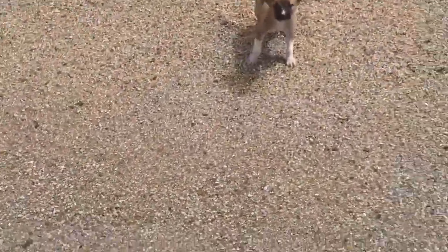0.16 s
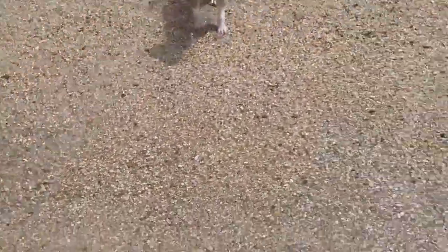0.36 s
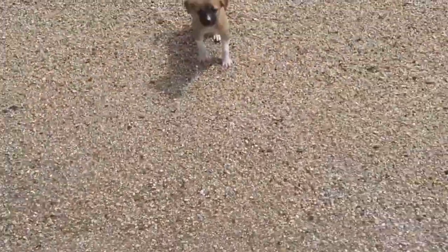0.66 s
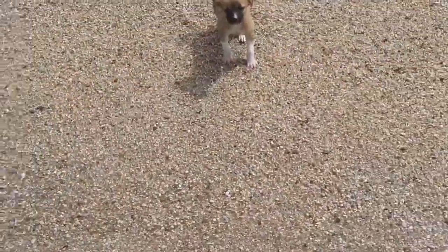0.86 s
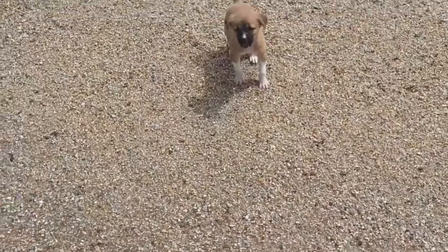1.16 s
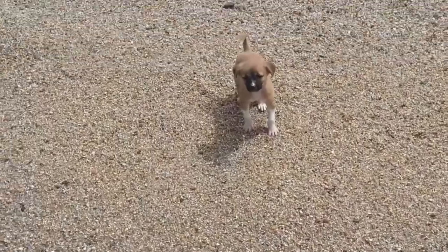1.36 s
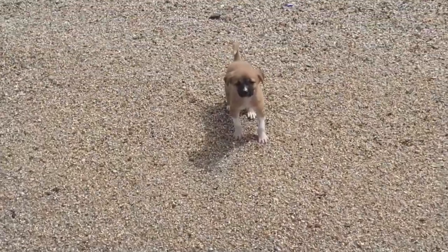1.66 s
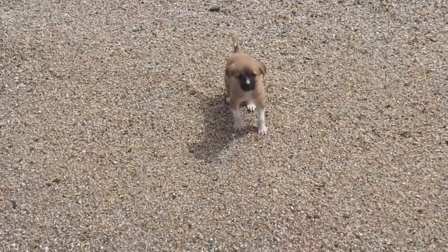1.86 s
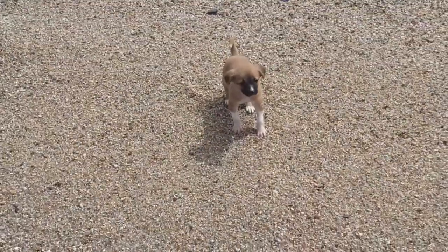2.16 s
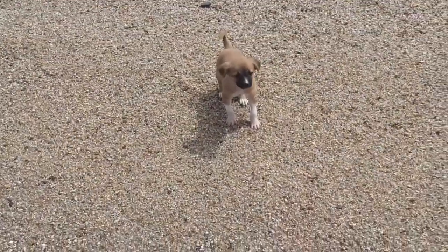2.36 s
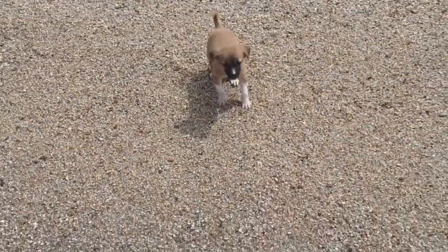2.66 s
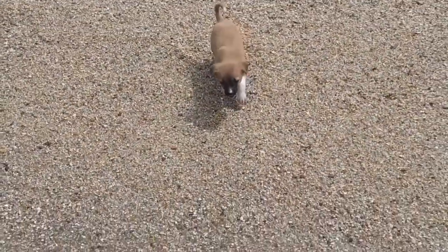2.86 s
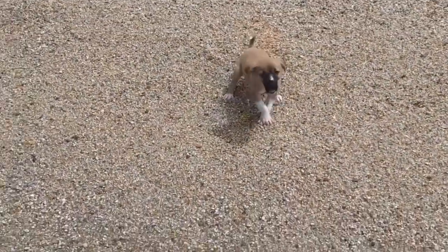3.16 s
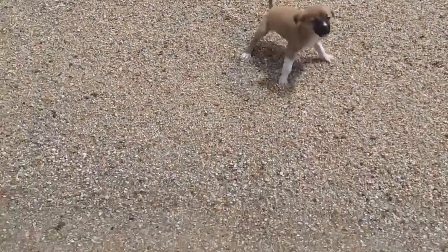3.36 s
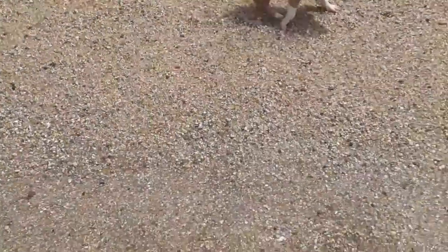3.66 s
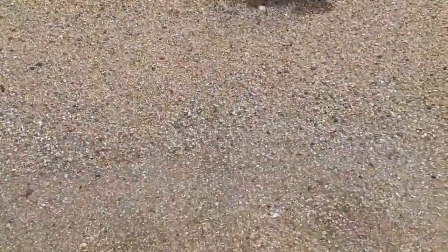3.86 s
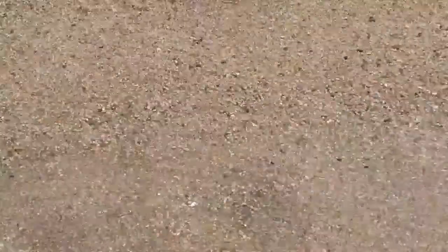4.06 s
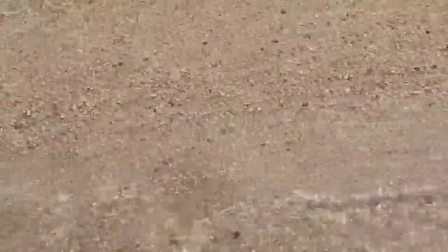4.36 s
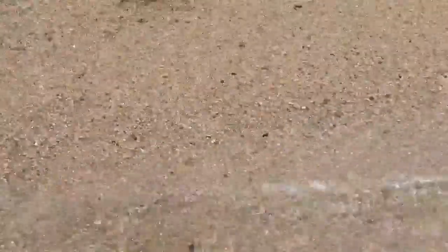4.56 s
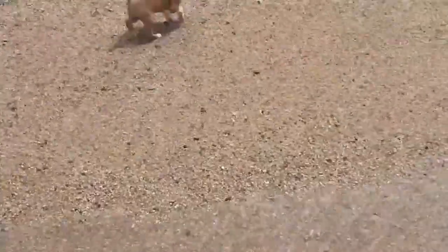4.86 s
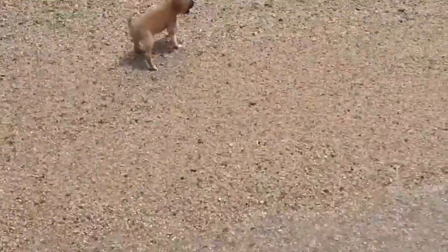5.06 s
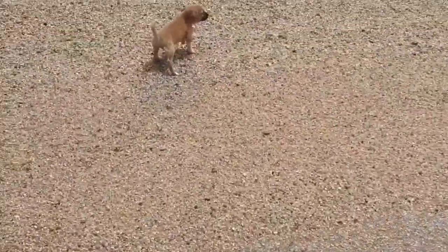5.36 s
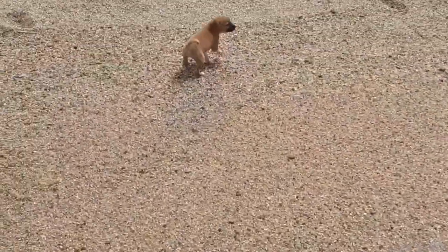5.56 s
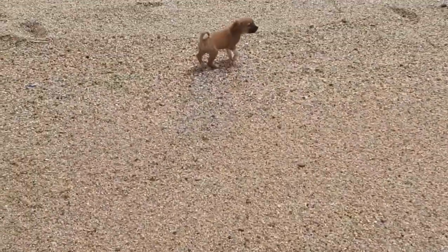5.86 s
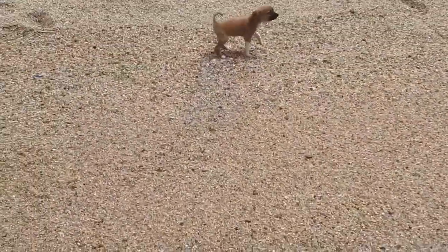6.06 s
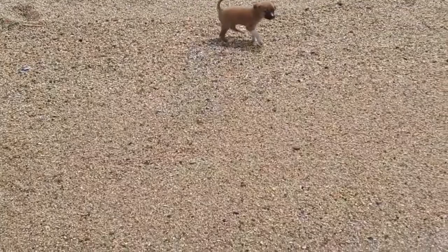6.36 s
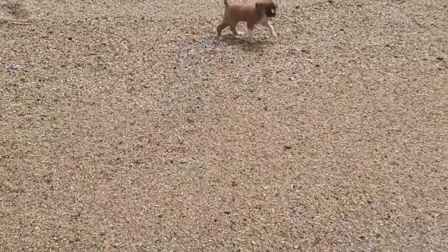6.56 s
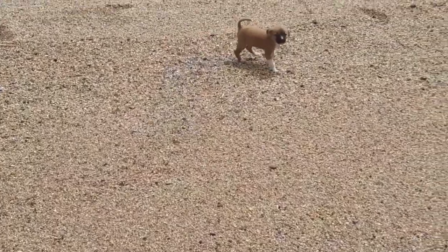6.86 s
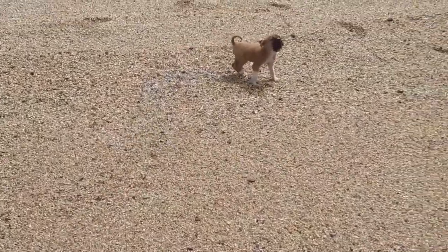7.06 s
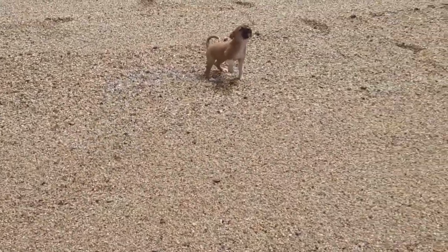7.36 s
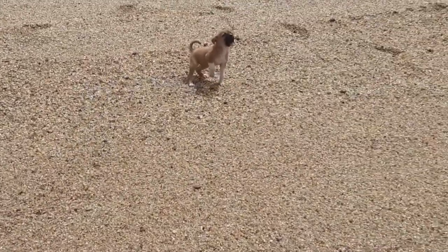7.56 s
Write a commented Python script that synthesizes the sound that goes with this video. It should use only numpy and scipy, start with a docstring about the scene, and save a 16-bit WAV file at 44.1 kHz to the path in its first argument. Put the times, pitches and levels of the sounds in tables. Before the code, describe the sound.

A small puppy yelps close to a stereo microphone on an open pebble beach, with very little echo. A strong, slightly broken yelp opens at 0 s, amid brief soft wind bumps that fade by 0.3 s. Single high yips follow at about 0.6, 1.2 and 1.8 s, with a tiny faint squeak at 2.25 s. At 2.6 s comes the loudest, brightest yip, running into a tight cluster of longer, whining cries until about 3.5 s, increasingly hoarse. From 3.7 to 7 s softer yelps repeat roughly every 0.4 to 0.5 s, rising quickly, cracking into rasp and dropping into thin whines; those near 6.6 and 7.1 s are somewhat stronger. A weak whimper at 7.35 s precedes a last yelp near 7.6 s. Underneath, quiet low surf swells gently, fullest around 6.3 s, with faint wind and fine pebble ticks that gradually thin out.

```python
"""On an open pebble beach a small puppy yelps close by, over low surf, ticking pebbles and light wind.
Source and filter make each yelp: vocal pulses on a gliding pitch, driven by one push, pass throat and jaw.
Most yelps climb and fall in pitch, many break into a rasp, and a thin whine runs beneath the push.
Surf is filtered noise with a slow swell, pebbles are short random ticks, and wind is low noise in gusts."""
import sys
import numpy as np
from scipy import signal
from scipy.fft import rfft, irfft, next_fast_len
from scipy.io import wavfile
from scipy.ndimage import uniform_filter1d, minimum_filter1d

SR = 44100
rng = np.random.default_rng(int(sys.argv[2]) if len(sys.argv) > 2 else 0)


def store_pcm(level_fs):
    """Save levels as 16-bit WAV."""
    pcm = np.round(np.clip(level_fs, -1, 1) * 32767).astype(np.int16)
    wavfile.write(sys.argv[1], SR, np.atleast_2d(pcm).T)


N = 340893  # length [samples]
EDGE_HZ = 15750  # upper band limit


# One yelp a row: (start [s], length [s], pitch rise [s], pitch fall [s], start pitch [Hz], top pitch [Hz],
#  whine pitch [Hz], delay to full push [s], attack [s], hold [s], release [s], relative push level [dB],
#  relative whine level [dB], upper against lower partials [dB]); shifts, lift and droop then bend the pitch
YELP_ROWS = [(0.0, 0.29, 0.089, 0.025, 1296, 1405, 1090, 0, 0.01, 0.073, 0.037, -6, -45, -12),
             (0.549, 0.38, 0.073, 0.048, 945, 1400, 1092, 0.05, 0.016, 0.0087, 0.093, -18, -45.5, -14.5),
             (1.142, 0.44, 0.092, 0.025, 860, 1366, 993, 0.041, 0.017, 0.025, 0.044, -13.5, -42.8, -3),
             (1.779, 0.24, 0.086, 0.041, 815, 1462, 1003, 0.05, 0.02, 0.011, 0.076, -8.5, -39.5, -14),
             (2.248, 0.045, 0.029, 0.062, 893, 968, 890, 0.0021, 0.005, 0.012, 0.012, -38.5, -56.0, -21),
             (2.566, 0.19, 0.086, 0.02, 732, 1567, 1400, 0.042, 0.015, 0.025, 0.028, 2, -29, -9.5),
             (2.746, 0.22, 0.14, 0.14, 1254, 1562, 1420, 0.052, 0.033, 0.11, 0.06, -9, -31, -7),
             (3.125, 0.21, 0.028, 0.12, 1166, 1428, 1346, 0.037, 0.024, 0.12, 0.061, -9, -32.5, -9.3),
             (3.326, 0.24, 0.17, 0.02, 1124, 1400, 1303, 0.065, 0.045, 0.11, 0.039, -10.5, -37, -9),
             (3.704, 0.31, 0.066, 0.12, 955, 1351, 1138, 0.037, 0.041, 0.079, 0.093, -17.5, -50.5, -4.5),
             (4.186, 0.32, 0.12, 0.035, 880, 1453, 1101, 0.023, 0.021, 0.005, 0.15, -20.5, -47.7, 1),
             (4.644, 0.22, 0.11, 0.052, 888, 1364, 1070, 0.039, 0.047, 0.055, 0.083, -23, -56, 1),
             (5.027, 0.19, 0.1, 0.058, 891, 1306, 985, 0.036, 0.044, 0.0054, 0.17, -24.5, -44, -4),
             (5.399, 0.19, 0.094, 0.053, 869, 1320, 975, 0.056, 0.086, 0.047, 0.057, -21.5, -52, -3),
             (5.77, 0.22, 0.085, 0.062, 752, 1276, 954, 0.011, 0.0088, 0.069, 0.04, -23.5, -46, -2.5),
             (6.168, 0.3, 0.12, 0.038, 729, 1324, 1027, 0.0087, 0.152, 0.12, 0.045, -20, -52, -0.9),
             (6.578, 0.32, 0.13, 0.069, 810, 1371, 1055, 0.032, 0.038, 0.1, 0.061, -14, -46.0, -4.5),
             (7.056, 0.33, 0.031, 0.12, 846, 1327, 936, 0.063, 0.12, 0.04, 0.074, -14.5, -50.5, -7.5),
             (7.339, 0.096, 0.038, 0.044, 954, 919, 860, 0.017, 0.037, 0.043, 0.008, -36.5, -58, -34),
             (7.573, 0.23, 0.055, 0.093, 817, 1263, 1110, 0.1, 0.12, 0.0055, 0.068, -15, -49, -7.5)]
# Level difference of the puppy at two microphone ports: (frequency [Hz], left minus right [dB])
PORT_BALANCE = [(1400, -2), (4300, -3), (7000, -9.5), (9000, 7), (13000, 6.5)]
# Phase difference at the ports: (frequency [Hz], lead of left over right [rad])
PORT_PHASE = [(1400, 0.29), (3200, 1.01), (4000, 0.84), (5000, 1.2)]


def puppy():
    """Superposition: the direct yelps, with level and phase differences at the ports, plus ground scatter."""
    voice = sum(yelp(*row) for row in YELP_ROWS)

    def port_response(hz):
        half_phases = np.outer([.5, -.5], read(PORT_PHASE, hz))
        return ports(PORT_BALANCE, hz) * np.exp(1j * half_phases)

    return shaped(voice, port_response) + beach(voice)


# Nasal radiation of the whine's upper partials: (frequency [Hz], relative level [dB])
NOSE_RESPONSE = [(2700, -43.5), (3300, -11), (4100, -8.5), (4600, 0), (5400, -6), (6200, -12), (7000, -8.5),
                 (8500, -26.5)]
LOWER_DB_PER_OCTAVE, UPPER_DB_PER_OCTAVE = 20, 24.5  # a higher voice is louder, and brighter
WHINE_SWELL_DB, WHINE_BRIGHT_DB = 10, -15.5  # the whine is dull and grows towards its end


def yelp(start, length, rise_s, fall_s, start_hz, top_hz, whine_hz,
         delay_s, attack_s, hold_s, release_s, level_db, whine_db, bright_db):
    """Source-filter principle: effort and pitch weight the partials of a push laid over a thin whine."""
    t = np.arange(max(round(start * SR), 0), min(round((start + length) * SR), N)) / SR
    age = t - start
    step, step_db = voice_shift(t)
    hz = pitch(age, length, rise_s, fall_s, start_hz, top_hz, whine_hz) * (1 + step)
    octaves = np.log2(hz / top_hz)
    effort_db = level_db + push(age - delay_s, attack_s, hold_s, release_s) + surges(t)
    whine = gain_of(whine_db + WHINE_SWELL_DB * (age / length - 1))

    pulses = folds(t, hz)
    lower, upper = throat(t, pulses)
    nasal = evened(shaped(pulses, lambda f: gain_of(read(NOSE_RESPONSE, f))))
    lower_push = gain_of(effort_db + LOWER_DB_PER_OCTAVE * octaves + step_db)
    upper_push = gain_of(effort_db + UPPER_DB_PER_OCTAVE * octaves + bright_db)
    sound = lower * np.hypot(lower_push, whine) + upper * upper_push
    sound += nasal * whine * gain_of(WHINE_BRIGHT_DB)

    fade_s = 0.0036
    fade = np.clip(np.minimum(age, length - age) / fade_s, 0, 1)
    return np.interp(np.arange(N) / SR, t, sound * fade, 0, 0)


FALL_POWER = 2.5  # how sharply the pitch leaves its top
END_DROOP, DROOP_S = .16, .016  # share of the pitch lost as the whine stops, and its time constant


def pitch(t, length, rise_s, fall_s, start_hz, top_hz, whine_hz):
    """Frequency glide: climb to the top, settling onto the whine, then a slight lift and a final droop."""
    lift, lift_s = .04, .06
    climb = (top_hz - start_hz) * np.maximum(1 - t / rise_s, 0) ** 2
    fall = (np.maximum(t - rise_s, 0) / fall_s) ** FALL_POWER
    settle = (top_hz - whine_hz) * (1 - 1 / (1 + fall))
    ending = 1 + lift * np.exp((t - length) / lift_s) - END_DROOP * np.exp((t - length) / DROOP_S)
    return (top_hz - climb - settle) * ending


PUSH_DB, PUSH_POWER = 23.5, 1.37  # gained over one attack time and lost over one release time


def push(t, attack_s, hold_s, release_s):
    """Effort envelope [dB]: attack up to time 0, hold, then a release that steepens."""
    away = np.maximum(-t, 0) / attack_s + np.maximum(t - hold_s, 0) / release_s
    return -PUSH_DB * away ** PUSH_POWER


# Shifts of the voice: flips into another register, or moments locked onto the throat resonance:
#  (start [s], end [s], pitch step [share], step of the lower partials [dB])
VOICE_SHIFTS = [(0.082, .335, -.06, -2.5), (1.184, 1.219, -0.029, -6), (2.616, 2.645, -0.12, -11),
                (2.82, 2.889, -0.026, -5), (3.238, 3.348, -0.066, -8.5), (3.47, 3.484, -.03, -4.5),
                (3.811, 4.025, -0.00071, -4), (5.487, 5.51, .01, 5), (5.835, 5.865, 0.016, 5),
                (6.681, 6.905, -0.041, -6), (7.666, 7.77, -0.065, -6.5)]
SHIFT_S = .004  # duration of each edge


def voice_shift(t):
    """Register transition or resonance locking: steps of pitch (share) and lower partials (dB)."""
    steps = 0
    for start, end, step, step_db in VOICE_SHIFTS:
        shifted = np.clip(np.minimum(t - start, end - t) / SHIFT_S + .5, 0, 1)
        steps = steps + np.outer([step, step_db], shifted)
    return steps


# Where the voice breaks: (start [s], end [s], chaos [0-1], lingering of period doubling afterwards [s])
VOICE_BREAKS = [(0, 0.064, 0.52, 0.0021), (2.821, 2.875, 0.39, 0.015), (3.12, 3.229, 0.87, 0.021),
                (3.387, 3.462, 0.59, 0.025), (3.71, 3.791, 0.8, 0.027), (4.217, 4.291, 0.94, 0.004),
                (4.675, 4.724, 0.84, 0.038), (5.069, 5.113, 0.46, 0.037), (5.456, 5.479, 0.26, 0.0031),
                (5.824, 5.82, 0.26, 0.0018), (6.211, 6.235, 0.63, 0.021), (6.616, 6.679, 0.95, 0.024),
                (7.065, 7.181, 0.87, 0.0057), (7.36, 7.358, 0, 0.031), (7.618, 7.673, 0.67, 0.0032)]
STRAIN, STRAIN_S = 0.21, 0.034  # the voice frays as a break comes near: share of its chaos, time constant
JITTER = .002  # rms share of the pitch, always present


def folds(t, hz):
    """Coupled oscillators: clean pulses rasp as two folds lose step, then alternate strong and weak."""
    rise_s, fall_s = 0.027, 0.02  # edges of a break

    def gate(start, end):
        return np.clip(np.minimum((t - start) / rise_s + 0.59, (end - t) / fall_s + .5), 0, 1)

    chaos, doubling = 0, 0
    for start, end, depth, linger in VOICE_BREAKS:
        strain = STRAIN * np.exp(-abs(t - start) / STRAIN_S) * (t < start)
        chaos = chaos + depth * np.maximum(gate(start, end), strain)
        doubling = doubling + gate(start, end + linger)

    chaos_jitter = 0.0569

    def phase_of(f):
        unsteady = 1 + JITTER * wobble(len(t), 120) + chaos_jitter * chaos * wobble(len(t), 306)
        return 2 * np.pi * np.cumsum(f * unsteady) / SR

    tilt_db, even_db = -3, -6  # per octave; a clean voice is hollow: its even partials are weak
    flicker_db, flicker_hz = 2.5, 30  # each partial waxes and wanes on its own

    def partial(angle, k):
        level_db = tilt_db * np.log2(k) + flicker_db * wobble(len(t), flicker_hz)
        return np.cos(k * angle) * gain_of(level_db) * (k * hz < EDGE_HZ)

    sag = .04  # the rasp pulls the pitch down
    slow_ratio, slow_share = .79, .8  # the second fold drags below the first
    angle, slow_angle = phase_of(hz * (1 - sag * chaos)), phase_of(hz * slow_ratio)
    pulses = sum(partial(angle, k) * gain_of(even_db * (k % 2 == 0)) for k in range(1, 15))
    slow_pulses = slow_share * chaos ** 2 * sum(partial(slow_angle, k) for k in range(1, 9))
    halves, shimmer = 0.42, 0.83
    strength = 1 + halves * doubling * np.cos(angle / 2) + shimmer * chaos * wobble(len(t), 420)

    air_hz, leak, rasp = 1300, 0.0056, 1.0
    body_db, body_hz, body_width_hz = 7, 1900, 380  # the rasp is throaty, with no bass

    def air_response(f):
        body = body_db * np.exp(-((f - body_hz) / body_width_hz) ** 2)
        return f ** 4 / (f ** 4 + air_hz ** 4) * gain_of(body)

    air = shaped(rng.standard_normal(len(t)), air_response)
    puffs = (leak + rasp * chaos) * (1 + np.cos(angle)) * air
    return (pulses + slow_pulses) * strength + puffs


def surges(t):
    """Random amplitude modulation: a rasp comes in uneven surges of level [dB]."""
    surge_db, surge_hz = 2.2, 55
    inside = sum(depth * (t > start) * (t < end) for start, end, depth, linger in VOICE_BREAKS)
    return surge_db * smooth(inside, size=300) * wobble(len(t), surge_hz)


# Response of throat and muzzle before the mouth moves it: (frequency [Hz], relative level [dB])
THROAT_RESPONSE = [(550, -66), (900, -13.5), (1150, -13.5), (1430, 5.5), (1750, 3), (2300, -0.5),
                   (2900, -26.5), (3450, -16.5), (4100, -14), (4900, -15), (5800, -21.5), (6500, -21),
                   (7300, -30.5), (8300, -42.5), (11000, -79), (13500, -37.5), (16000, -61.5)]
# Mouth: (time [s], jaw opening as lift of the second resonance [dB], factor on the throat's frequencies)
MOUTH_SHAPE = [(.1, -7, 0.97), (.75, -24, 0.92), (1.35, -10.5, 0.94), (1.9, -21, 0.97), (2.65, -10.5, 0.99),
               (2.86, 5, 0.99), (3.35, -11.5, 0.97), (3.85, -4, 1.003), (4.35, 4, 0.99), (4.75, 1, 0.99),
               (5.1, -13.5, 1.035), (5.5, -20, 0.97), (5.9, -13, .99), (6.7, -6.5, 1.005), (7.25, -5, 0.97),
               (7.65, -3.5, 0.96)]


def throat(t, pulses):
    """Tract resonance: throat and jaw filter the pulses into lower and upper partials, each evened."""
    jaw_db, scale = follow(MOUTH_SHAPE, t.mean())
    jaw_hz, jaw_width_hz, notch_hz = 2020, 340, 2900

    def tract_response(f):
        shift = scale ** np.minimum(f / notch_hz, 1) ** 2  # the mouth moves the upper resonances most
        jaw = jaw_db * np.exp(-((f - jaw_hz) / jaw_width_hz) ** 2)
        return gain_of(read(THROAT_RESPONSE, f / shift) + jaw)

    voice = shaped(pulses, tract_response)
    lower = shaped(voice, lambda f: 1 / (1 + (f / notch_hz) ** 24))
    return steadied(lower), steadied(voice - lower)


def beach(x):
    """Diffuse scattering: open ground returns only a faint, short, decaying scatter off the pebbles."""
    t = np.arange(SR // 3) / SR
    scatter_db, t60 = -31, .25  # t60 in s
    taps = rng.standard_normal((2, len(t))) * gain_of(-60 * t / t60) * (t > .004)
    taps /= np.linalg.norm(taps[0])
    return gain_of(scatter_db) * signal.fftconvolve(x[None], taps, axes=1)[:, :N]


# Spectrum of the wash: (frequency [Hz], relative level per Hz [dB])
SURF_SPECTRUM = [(25, -63.5), (60, -20), (105, 4), (170, -6), (330, 2), (500, -10), (1200, -18.5),
                 (1900, -20), (3000, -31.5), (6300, -30.5), (9800, -46.5), (13500, -38.5), (16000, -42)]
# Slow swell of the roar: (time [s], relative level [dB])
SURF_SWELL = [(0, -36.5), (.8, -45), (2.1, -38), (3.2, -41.5), (3.8, -42), (4.7, -39), (5.6, -35),
              (6.3, -32), (7.7, -35.5)]
# Likeness of the two channels: (frequency [Hz], correlation)
SURF_LIKENESS = [(50, 0.1), (190, 1), (1000, 0.057), (12000, 0.4)]
# Level difference of surf and pebbles: (frequency [Hz], left minus right [dB])
SHORE_BALANCE = [(60, 0.5), (300, -3.5), (800, 0.5), (6000, -4), (12000, 12.5)]


def surf():
    """Partly coherent noise: a low wash swells slowly, with drifting patches as small waves fold."""
    frames, hz = N // 256 + 5, np.fft.rfftfreq(1024, 1 / SR)
    a, b, c, d, patches = rng.standard_normal((frames, 513, 5)).T
    patch_db, surf_db, hiss_db = 2, 2.5, -37
    patches = uniform_filter1d(patches, size=10, axis=0)  # across frequency
    patches = evened(uniform_filter1d(patches, size=8, axis=1))  # across time
    same = np.clip(read(SURF_LIKENESS, hz), -1, 1)[:, None]
    left, other = a + 1j * b, c + 1j * d
    bins = np.array([left, same * left + np.sqrt(1 - same ** 2) * other])
    spectrum_db = read(SURF_SPECTRUM, hz)[:, None] + patch_db * patches
    bins *= ports(SHORE_BALANCE, hz)[:, :, None] * gain_of(spectrum_db)
    wash = evened(signal.istft(bins, nperseg=1024, noverlap=768)[1][:, :N])
    hiss = shaped(wash, lambda f: f ** 2 / (f ** 2 + 3000 ** 2))  # stays steady while the roar swells
    swell_db, = follow(SURF_SWELL, np.arange(N) / SR)
    return gain_of(surf_db + swell_db) * (wash - hiss) + gain_of(hiss_db) * hiss


# Eddies of wind: (time of the peak [s], width [s], level of the eddy, added to the breeze [dB])
WIND_EDDIES = [(0.0, 0.047, -28.5), (0.147, 0.02, -25), (0.199, 0.037, -26), (.85, 0.077, -41.5),
               (4.65, 0.085, -40), (6.3, 0.18, -41.5)]
# Spectrum of the buffeting: (frequency [Hz], relative level per Hz [dB])
BUFFET_SPECTRUM = [(20, -40.5), (60, -4.5), (110, 1), (280, -9.5), (1000, -44.5)]
BREEZE_DB = -55


def gust():
    """Turbulent pressure: shared bumps of level over a breeze, with independent low noise at each port."""
    t = np.arange(N) / SR
    eddies = sum(gain_of(db) * np.exp(-((t - s) / width) ** 2) for s, width, db in WIND_EDDIES)
    buffeting = shaped(rng.standard_normal((2, N)), lambda f: gain_of(read(BUFFET_SPECTRUM, f)))
    return (gain_of(BREEZE_DB) + eddies) * evened(buffeting)


# Level of the shifting pebbles: (time [s], level [dB])
PEBBLE_LEVEL = [(0, -54.5), (3.3, -60), (4.6, -61), (5.3, -60.5), (5.9, -62), (7.7, -69)]
# Spectrum of the ticks: (frequency [Hz], relative level per Hz [dB])
PEBBLE_SPECTRUM = [(800, -25), (2500, 10), (9500, -7), (13500, -21)]


def pebbles():
    """Random impacts: small stones tick against each other as brief, decaying noise bursts."""
    ticks_per_s, ring_s = 160, .0013  # mean rate; decay time constant
    strength = gain_of(3.5 * np.minimum(rng.exponential(1, N), 3))
    hits = (rng.random(N) < ticks_per_s / SR) * strength
    t = np.arange(SR // 100) / SR
    ticks = signal.oaconvolve(hits, np.exp(-t / ring_s))[:N] * rng.standard_normal((2, N))
    ticks = shaped(ticks, lambda f: gain_of(read(PEBBLE_SPECTRUM, f)) * ports(SHORE_BALANCE, f))
    level_db, = follow(PEBBLE_LEVEL, np.arange(N) / SR)
    return gain_of(level_db) * evened(ticks)


def gain_of(db):
    """Logarithmic level: decibels to amplitude gain."""
    return 10 ** (np.asarray(db) / 20)


def evened(x):
    """Normalization: scales to rms 1."""
    return x / np.sqrt(np.mean(x ** 2) + 1e-20)


def read(points, hz):
    """Interpolation of a spectrum table on a log-frequency axis."""
    f, value = np.transpose(points)
    return np.interp(np.log(hz + 1), np.log(f + 1), value)


def follow(rows, t):
    """Linear interpolation of each column of a curve at the times t."""
    s, *columns = np.transpose(rows)
    return [np.interp(t, s, c) for c in columns]


def shaped(x, response):
    """Linear filtering: multiplies the spectrum by a response given as a function of frequency."""
    size = next_fast_len(x.shape[-1] + 2048)
    spectrum = rfft(x, size) * response(np.fft.rfftfreq(size, 1 / SR))
    return irfft(spectrum, size)[..., :x.shape[-1]]


def wobble(count, hz):
    """Low-passed noise: random motion of rms 1 that rolls off above hz."""
    return evened(shaped(rng.standard_normal(count), lambda f: 1 / (1 + (f / hz) ** 4)))


def smooth(x, size):
    """Moving average, applied twice for a triangular weighting."""
    return uniform_filter1d(uniform_filter1d(x, size), size)


def steadied(x):
    """Automatic gain: holds the short-time rms near 1 and leaves the fastest flutter in."""
    return x / np.sqrt(abs(smooth(x ** 2, size=640)) + 1e-12)


def ports(balance, hz):
    """Interchannel level difference: splits a table of differences into left and right gains."""
    return gain_of(np.outer([.5, -.5], read(balance, hz)))


def scene():
    """Superposition of puppy, surf, wind and pebbles."""
    return puppy() + surf() + gust() + pebbles()


def record(dry):
    """Peak limiting, then band limiting: a quick limiter holds peaks to 0.95 ahead of a low-pass."""
    room = np.minimum(.95 / (abs(dry).max(0) + 1e-9), 1)
    held = dry * smooth(minimum_filter1d(room, size=200), size=100)
    low_pass = signal.firwin(511, EDGE_HZ, window=("kaiser", 9), fs=SR)
    return signal.oaconvolve(held, low_pass[None], "same")


dry = scene()
out = record(dry)
store_pcm(out)
```